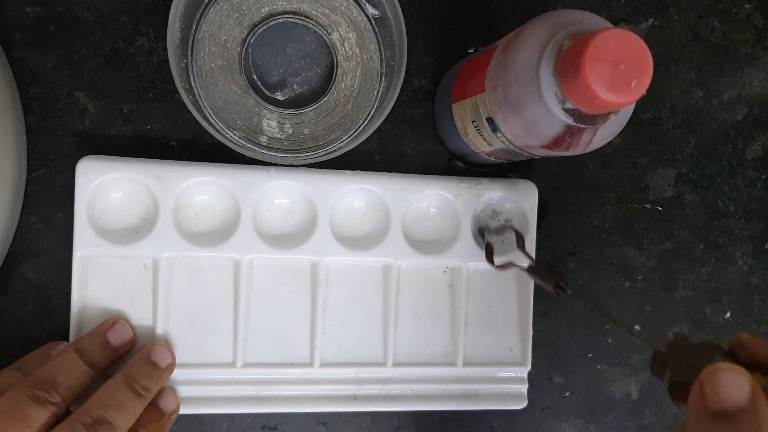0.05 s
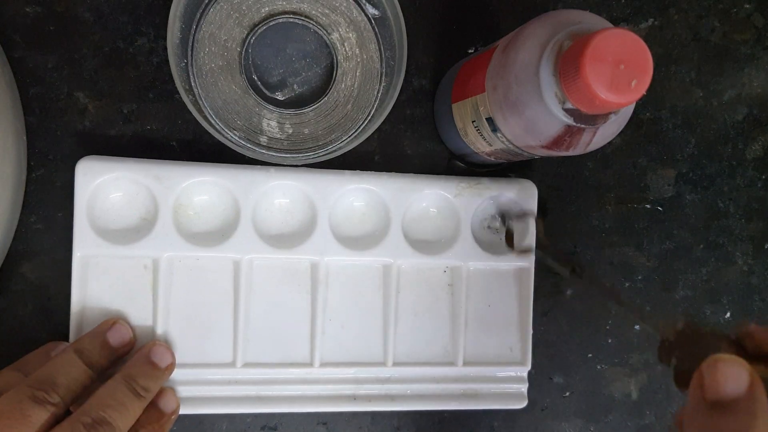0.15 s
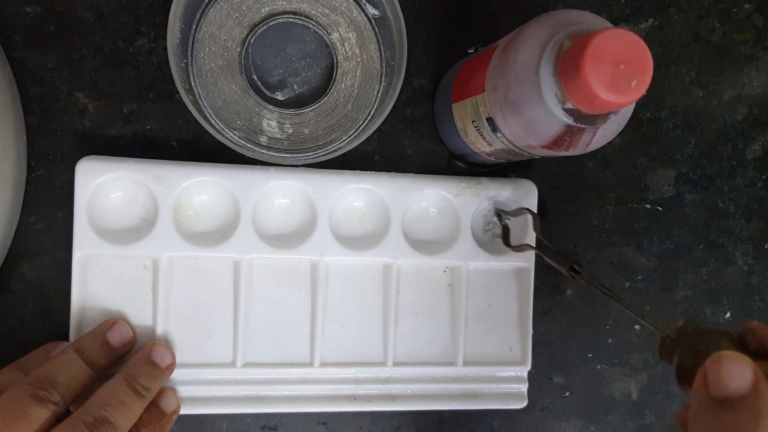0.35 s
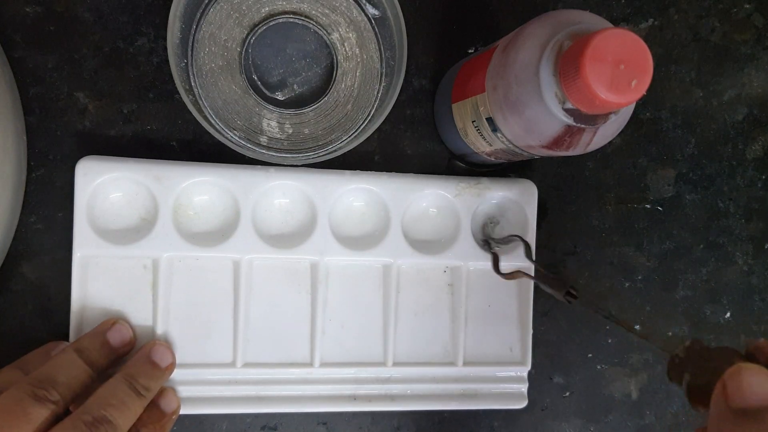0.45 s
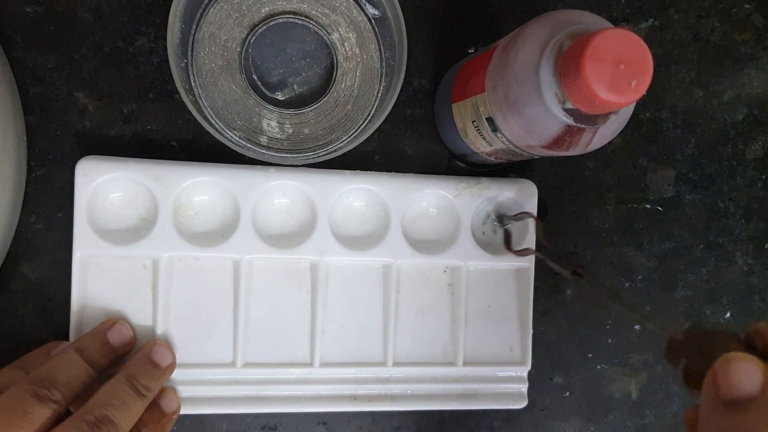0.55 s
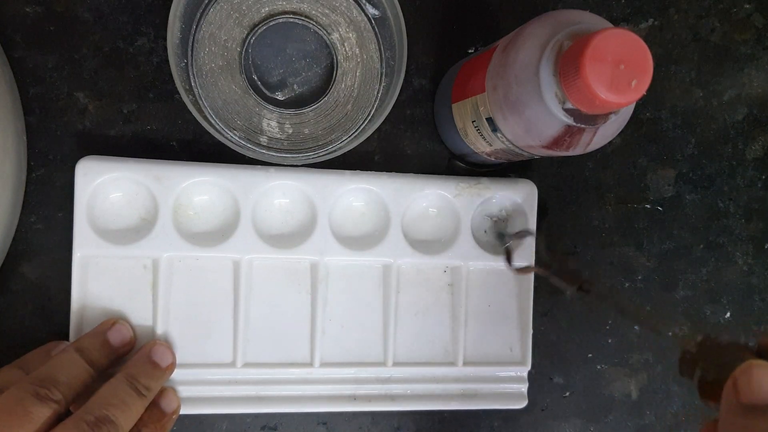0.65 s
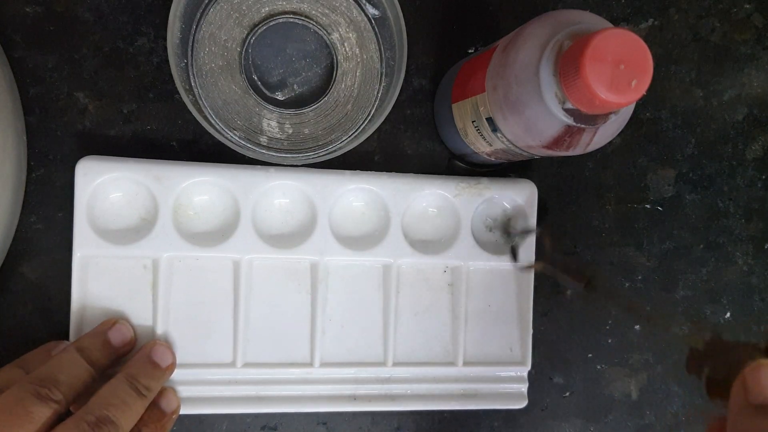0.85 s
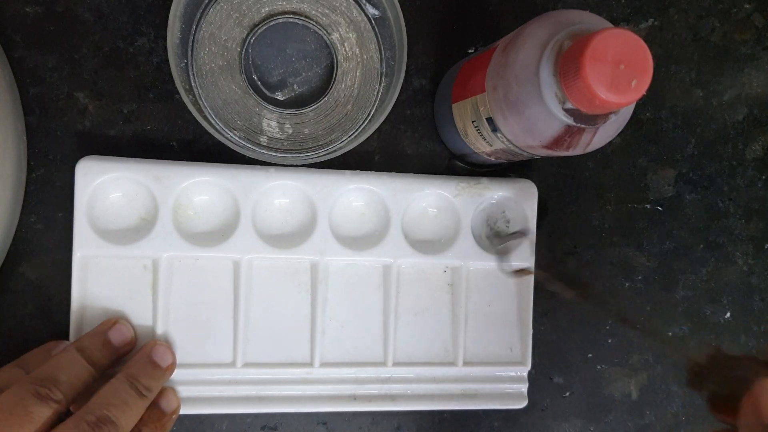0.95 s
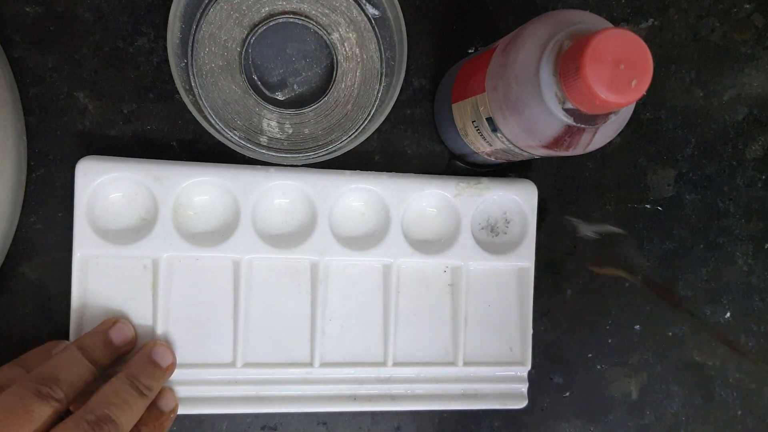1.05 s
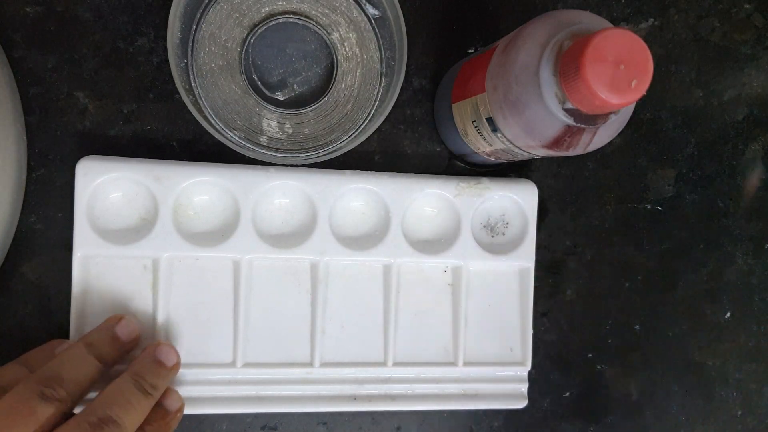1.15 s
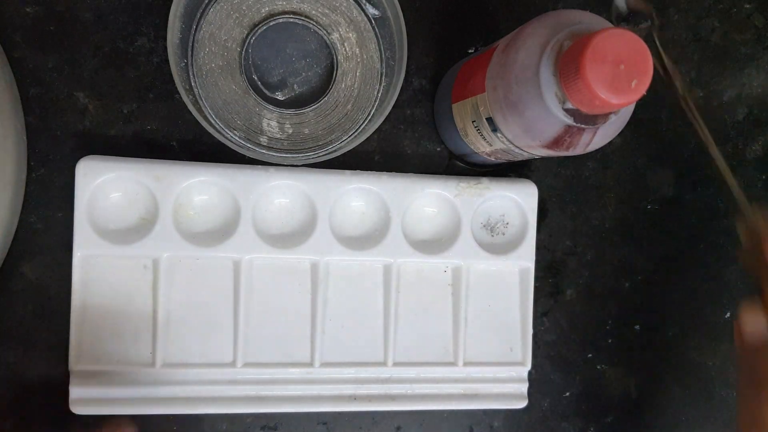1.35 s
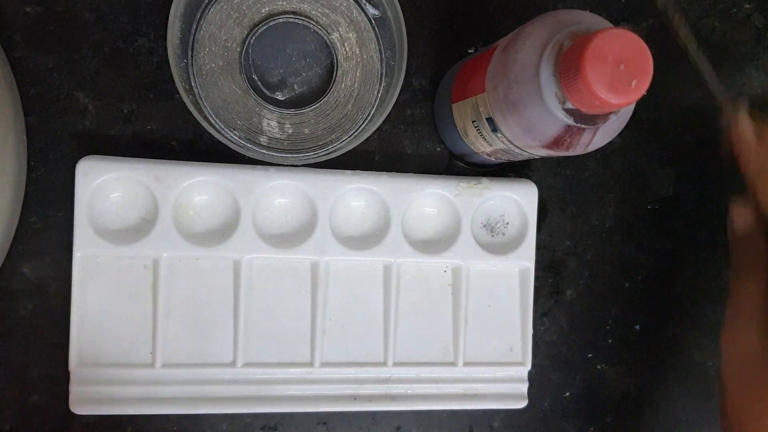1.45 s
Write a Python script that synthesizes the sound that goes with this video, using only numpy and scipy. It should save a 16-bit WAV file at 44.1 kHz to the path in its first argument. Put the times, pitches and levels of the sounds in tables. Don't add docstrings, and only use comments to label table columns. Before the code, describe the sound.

A small metal tool knocks and scrapes in a ceramic palette well. Faint grit and taps lead to a dense, rasping cluster at 0.2 s, a hollow knock at 0.39 s with a short groan, lighter clicks around 0.6 s, then the sharpest knock at 0.83 s with a thin squeak by 0.9 s. After 1 s only hiss, low hum, faint distant hoots and a soft bump near 1.43 s remain.

```python
import sys
import numpy as np
from scipy import signal
from scipy.fft import rfft, irfft, next_fast_len
from scipy.io import wavfile
from scipy.ndimage import map_coordinates

SR = 44100
rng = np.random.default_rng(int(sys.argv[2]) if len(sys.argv) > 2 else 0)


def generate_wav(signal):
    frames = np.transpose(np.atleast_2d(signal))
    scaled = np.clip(frames, -1, 1) * 32767
    pcm = np.round(scaled).astype(np.int16)
    wavfile.write(sys.argv[1], SR, pcm)


def invert_db(level):
    return 10 ** (np.asarray(level, dtype=float) / 20)


N = 66150
TIME = np.arange(N) / SR

# frequency in Hz, density in dB per Hz.
CRACK_SPECTRUM = [(1500, -28), (2300, -0.5), (3000, -9.5), (3900, -4), (4500, -4), (6500, -3), (8400, -9),
                  (13000, -32)]


def unit(x):
    return x / np.sqrt(np.mean(x ** 2) + 1e-20)


def along(points, hz):
    f, v = np.transpose(points)
    return np.interp(np.log(hz + 1), np.log(f + 1), v)


def wobble(rate):
    return map_coordinates(rng.standard_normal(N // 20), [TIME * rate])


def filtered(x, response):
    m = next_fast_len(N + SR // 2)
    return irfft(rfft(x, m) * response(np.fft.rfftfreq(m, 1 / SR)), m)[..., :N]


def noise(spectrum):
    return unit(filtered(rng.standard_normal(N), lambda hz: invert_db(along(spectrum, hz))))


def resonances(modes):
    def response(f):
        total = 0
        for k, (centre, width, db) in enumerate(modes):
            mode = 1j * f * width / (centre * centre - f * f + 1j * f * width)
            total = total + (-1) ** k * invert_db(db) * mode
        return total
    return response


def swell(peak_s, rise_s, fall_s):
    return np.exp(-((TIME - peak_s) / np.where(TIME < peak_s, rise_s, fall_s)) ** 2)


def radiated(f):
    corner_hz, damping = 481, 1.204
    return (f * f / (f * f - corner_hz ** 2 - 1j * damping * f * corner_hz)) ** 3


def in_tile(force):
    # frequency in Hz, width in Hz, level in dB.
    tile_modes = [(389, 180, -26), (590, 51, -13), (725, 18, -0.5), (875, 110, -5.5), (1121, 69, -5.5),
                  (1247, 80, -8.5), (1449, 48, -7), (1575, 35, -13), (1750, 44, -16.5), (1965, 42, -8.5),
                  (2270, 140, -17), (2720, 33, -12.5), (3478, 120, -17), (4165, 29, -11.5)]
    contact_s = 0.0011
    modal = resonances(tile_modes)
    return filtered(force, lambda f: modal(f) * radiated(f) / (1 + 1j * f * contact_s))


def taps():
    # start in seconds, peak in dB, pitch in Hz, crack over knock in dB.
    knock_rows = [(.035, -51.5, 875, -17), (0.0904, -49.5, 1000, -31), (.096, -49, 1080, -27),
                  (.105, -55, 895, -16), (.1545, -39.5, 821, -27), (0.16, -41, 848, -23.5),
                  (.2025, -31.5, 780, -23), (.2075, -36, 800, -24), (0.212, -35, 900, -19),
                  (.218, -34.5, 860, -11), (.2235, -37, 864, -12), (.389, -26.5, 760, -33.5),
                  (.3965, -31.5, 770, -39), (0.5807, -42.5, 1750, -19.5), (.583, -45.5, 2265, -25),
                  (.582, -33.5, 890, -23), (.586, -36.5, 1280, -31), (.589, -40, 2230, -24),
                  (.597, -36, 897, -18.5), (.604, -46, 885, -27), (.611, -48, 850, -27),
                  (.625, -50, 800, -27), (0.743, -52, 960, -25), (.756, -49.5, 1186, -36),
                  (0.829, -47, 1000, -26), (.831, -23, 830, -29), (.844, -40, 920, -34),
                  (.851, -47, 950, -28.5), (0.86, -38, 887.3, -26), (0.864, -50, 950, -24),
                  (.870, -47, 900, -25), (.877, -46, 800, -30), (0.8923, -48.5, 876, -6),
                  (1.007, -60.5, 873, -35.5), (1.208, -71, 1000, -27.5)]
    knock_t60_s, attack_s, crack_t60_s = 0.017, 0.00076, 0.045
    tile_db = -6.5
    direct, force, crack = np.zeros(N), np.zeros(N), noise(CRACK_SPECTRUM)
    for s, db, hz, crack_db in knock_rows:
        t = np.maximum(TIME - s, 0)
        attack = 1 - np.exp(-(t / attack_s) ** 2)
        direct += invert_db(db + 5 - 60 * t / knock_t60_s) * attack * np.sin(2 * np.pi * hz * t)
        direct += invert_db(db + crack_db - 60 * t / crack_t60_s) * (t > 0) * crack
        force[int(s * SR)] = invert_db(db + 31.5 + tile_db)
    return filtered(direct, radiated) + in_tile(force)


def scrape():
    # peak in seconds, rise in seconds, fall in seconds, level in dB,
    # hiss over body in dB.
    stroke_rows = [(.005, 0.0052, 0.077, -61.5, -8), (.098, 0.011, 0.012, -57.5, -34),
                   (.165, 0.015, 0.021, -68, -10), (.2, 0.013, 0.0033, -50, -18),
                   (0.257, 0.03, 0.017, -47, -21), (0.329, 0.037, 0.036, -62.5, -16),
                   (0.412, 0.018, 0.0071, -53.5, -26), (0.459, 0.02, 0.042, -63, -5),
                   (0.541, 0.013, 0.025, -60, -19), (0.612, 0.03, 0.019, -49.5, -16),
                   (0.667, 0.028, 0.028, -56.5, -9), (0.762, 0.04, 0.036, -61, -24),
                   (0.861, 0.018, 0.019, -55.5, -23), (0.939, 0.038, 0.042, -63.5, -15.5)]
    grains_per_s, grain_spread_db = 3000, 1.5
    pressure, hiss = np.zeros(N), np.zeros(N)
    for s, rise_s, fall_s, db, hiss_db in stroke_rows:
        bell = invert_db(db) * swell(s, rise_s, fall_s)
        pressure += bell
        hiss += invert_db(hiss_db) * bell
    hits = rng.random(N) < grains_per_s / SR
    grains = hits * rng.standard_normal(N) * invert_db(grain_spread_db * wobble(89.18))
    return pressure * unit(in_tile(grains)) + hiss * invert_db(2.1 * wobble(120)) * noise(CRACK_SPECTRUM)


def groans():
    # peak in seconds, rise in seconds, level in dB, slip rate in Hz,
    # octave over fundamental in dB.
    groan_rows = [(.004, 0.018, -49.5, 728, 7.5), (0.202, 0.002, -39.5, 799.8, -22),
                  (0.216, 0.0069, -26.5, 714.5, -6), (.221, 0.0031, -27.5, 723.4, -19),
                  (0.239, 0.0026, -40.5, 756.2, -15), (0.253, .006, -40, 762.2, -14.5),
                  (0.261, 0.0039, -46.5, 725, 1), (0.273, 0.0028, -64, 717.3, -21),
                  (.317, 0.0071, -52, 725, -7), (0.419, 0.0013, -49, 771, -30),
                  (0.425, 0.0032, -38, 700.3, -19.5), (.437, 0.011, -36, 706.7, -8.5),
                  (0.474, 0.0017, -52, 725.4, -34.5), (.488, 0.0035, -64.5, 717.5, -17),
                  (0.536, 0.0095, -58, 730.7, -22), (0.552, 0.002, -58.5, 729.5, -7.5),
                  (0.639, 0.002, -52, 726.6, -17.5), (.656, 0.004, -46, 758.6, -25),
                  (0.682, 0.015, -63.5, 714.4, 15), (.765, 0.0074, -50, 763, -26),
                  (0.895, 0.0033, -43, 708.4, 0.5), (0.903, 0.005, -43.5, 709.3, -4.5)]
    fall_s, jitter = .0036, .008
    third_db, grit_db, shake_db = -33.5, -28, -16
    columns = np.transpose(groan_rows)
    slip_hz = np.interp(TIME, columns[0], columns[3]) * (1 + jitter * wobble(250))
    phase = 2 * np.pi * np.cumsum(slip_hz) / SR
    size, octave = np.zeros(N), np.zeros(N)
    for s, rise_s, db, hz, octave_db in groan_rows:
        bell = invert_db(db + 1) * swell(s, rise_s, fall_s)
        size += bell
        octave += invert_db(octave_db) * bell
    tone = size * (np.cos(phase) + invert_db(third_db) * np.cos(3 * phase - 1.2))
    tone += octave * np.cos(2 * phase - .6)
    slips = size * (1 + np.cos(phase - 1.5))
    grit = invert_db(grit_db) * slips * noise(CRACK_SPECTRUM)
    shake = rng.standard_normal(N)
    shaken = invert_db(shake_db) * in_tile(slips * shake) / in_tile(shake).std()
    return tone + grit + shaken


def squeaks():
    # peak in seconds, rise
    # in seconds, level in dB, pitch in Hz, # overtones over fundamental in dB.
    squeak_rows = [(.008, 0.037, -59.5, 2058, -7), (0.035, 0.03, -69.5, 2020, -8),
                   (0.215, 0.0084, -51, 1938, -29), (0.661, 0.024, -68.5, 2740, -14),
                   (0.674, 0.011, -58, 2084, -4), (0.687, 0.036, -72, 2774, -11),
                   (0.883, 0.0029, -49.5, 2018, -9.5), (0.892, .005, -47, 1995, -18.5),
                   (0.899, 0.0063, -65, 2583, -16), (0.912, 0.008, -59.5, 1985, -20),
                   (.940, .005, -68, 1985, -13)]
    partials_db = [0, -3, -2]
    fall_s, jitter, smear_rad = .005, .006, .35
    rough_db, shake_db = -2, -15.5
    out, force = np.zeros(N), np.zeros(N)
    drift = np.cumsum(1 + jitter * wobble(200)) / SR
    for s, rise_s, db, hz, over_db in squeak_rows:
        phase = 2 * np.pi * hz * drift
        bell = invert_db(db + 6.5) * swell(s, rise_s, fall_s)
        stack = np.sin(phase)
        for partial, partial_db in enumerate(partials_db, 2):
            level = invert_db(over_db + partial_db + rough_db * wobble(330))
            stack += level * np.sin(partial * phase + smear_rad * partial * wobble(360))
        out += bell * stack
        force += bell
    shake = np.diff(rng.standard_normal(N + 2), 2)
    return out + invert_db(shake_db) * in_tile(force * shake) / in_tile(shake).std()


def rings():
    # peak in seconds, rise in seconds, fall in seconds, level in dB, frequency
    # in Hz.
    ring_rows = [(.03, 0.034, 0.077, -73, 2035), (.02, 0.025, 0.039, -75, 6150),
                 (.315, 0.024, .012, -60, 1460), (.392, 0.0036, 0.015, -47, 590),
                 (.475, .012, 0.018, -64, 1450), (.584, 0.0054, 0.012, -55.5, 618),
                 (.600, 0.0034, .014, -46, 919), (.587, 0.0034, 0.0076, -56.5, 4153),
                 (.715, 0.019, .012, -64.5, 1455), (0.906, .01, 0.031, -69.5, 2630),
                 (1.005, .012, .02, -81, 1992), (1.05, .012, .015, -81.5, 2004),
                 (1.09, .015, .02, -85, 1980), (.045, 0.01, .012, -63, 1470), (.86, 0.013, 0.016, -51, 941),
                 (.157, 0.0024, 0.0067, -61.5, 417), (.205, 0.0048, 0.0089, -39.5, 1250),
                 (.207, 0.0042, 0.0063, -37.5, 897), (.220, 0.0083, .005, -29, 881),
                 (.222, 0.0035, 0.0092, -48.5, 2246), (.222, .006, .006, -66, 11130),
                 (.262, 0.0088, 0.006, -49.5, 1470), (.391, 0.0017, 0.0055, -40, 1116),
                 (.400, 0.0064, 0.011, -58, 413), (.426, 0.0049, .005, -48, 1070),
                 (.436, 0.0065, 0.021, -69, 2560), (.455, .006, 0.013, -56, 1404),
                 (.605, .005, 0.0072, -55.5, 2280), (.670, 0.014, 0.005, -60.5, 4160),
                 (.705, 0.015, 0.014, -64.5, 2100), (.833, 0.0042, 0.0055, -44.5, 1080),
                 (.833, 0.0015, 0.0095, -59, 2250), (.834, 0.0034, 0.0078, -66.5, 3490),
                 (.833, .003, 0.0049, -67, 10720), (.877, .004, 0.0056, -59, 1460),
                 (.915, 0.0082, 0.0098, -66.5, 3980), (.955, 0.0062, 0.007, -73, 3950),
                 (.970, 0.021, 0.01, -66.5, 1980), (.983, .006, 0.0063, -68, 1425)]
    wander = .3 * wobble(150)
    out = np.zeros(N)
    for s, rise_s, fall_s, db, hz in ring_rows:
        out += invert_db(db + 2) * swell(s, rise_s, fall_s) * np.sin(2 * np.pi * hz * (TIME - s) + wander)
    return out


def room(x):
    # frequency in Hz, T60 in seconds.
    room_t60 = [(400, 0.56), (1000, 0.31), (2000, 0.55), (5000, .35), (10000, 0.18)]
    level_db, delay_s, rise_s = -12.5, 0.0068, 0.0018
    hz, t, z = signal.stft(rng.standard_normal(SR // 2), SR, nperseg=256)
    decay = invert_db(-60 * t / along(room_t60, hz)[:, None])
    tail = signal.istft(z * decay * (1.2 - np.exp(-t / rise_s)), SR, nperseg=256)[1]
    delayed = np.pad(x, (int(delay_s * SR), 0))
    return invert_db(level_db) * signal.fftconvolve(delayed, tail / np.linalg.norm(tail))[:N]


def background():
    # frequency in Hz, density in dB per Hz.
    hiss_spectrum = [(410, -32), (700, -14.5), (946, -8), (1110, -2), (2180, -12), (2870, -8.5),
                     (3150, -8.5), (5670, -0.5), (13000, -1), (15900, -4)]
    # frequency in Hz, density in dB per Hz.
    rumble_spectrum = [(12, -22.5), (20, -18.5), (103, -6.5), (140, -20), (255, -10), (496, -7.5),
                       (527, -11), (570, -6), (800, -17), (1040, -59.5), (1760, -120)]
    # frequency in Hz, width in Hz, level in dB.
    hum_lines = [(78.6, 27, -77), (94, 7, -75.5), (266, 12, -83.5), (302, 11, -83), (501, 7.2, -88.5)]
    # peak in seconds, half length in seconds, level in dB, frequency in Hz.
    hoot_rows = [
        (1.071, 0.026, -77, 575),
        (1.131, 0.02, -76.5, 575),
        (1.234, 0.022, -70.5, 578),
        (1.345, 0.016, -72.5, 557),
        (1.41, 0.04, -75.5, 580),
        (1.473, 0.029, -88, 574),
    ]
    bump_s, bump_half_s, bump_db, bump_hz = 1.4255, .011, -60, 78
    out = invert_db(-71.5) * noise(hiss_spectrum)
    out += invert_db(-79 + 2.6 * wobble(39)) * noise(rumble_spectrum)
    for hz, width_hz, db in hum_lines:
        out += invert_db(db) * unit(filtered(rng.standard_normal(N), resonances([(hz, width_hz, 0)])))
    for s, half_s, db, hz in hoot_rows:
        out += invert_db(db + 1) * swell(s, half_s, half_s) * np.sin(2 * np.pi * hz * TIME)
    bump = swell(bump_s, bump_half_s, bump_half_s) * np.sin(2 * np.pi * bump_hz * (bump_s - TIME))
    return out + invert_db(bump_db) * bump


def scene():
    body = taps() + scrape()
    tones = filtered(groans(), radiated) + rings()
    thin = squeaks()
    to_room = body + invert_db(-5) * tones + invert_db(-10) * thin
    return (body + tones + thin + room(to_room) + background())[None]


def band_limit(x):
    return signal.sosfilt(signal.butter(12, 16080, fs=SR, output="sos"), x)


def record(dry):
    top_hz = 15710
    mix = filtered(dry, lambda hz: hz < top_hz)
    return band_limit(mix)


dry = scene()
out = record(dry)
generate_wav(out)
```